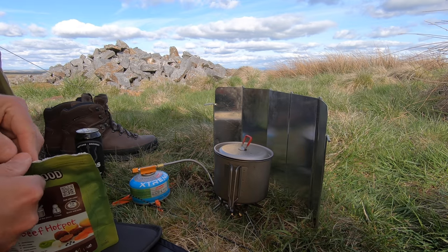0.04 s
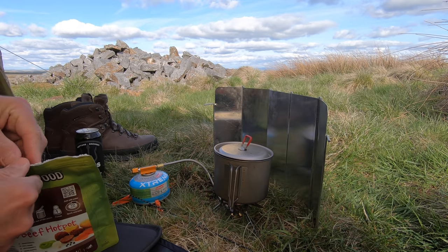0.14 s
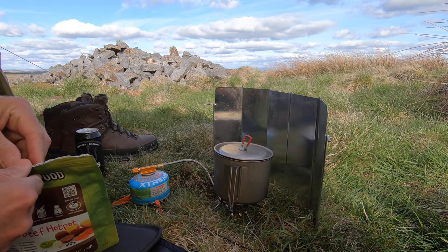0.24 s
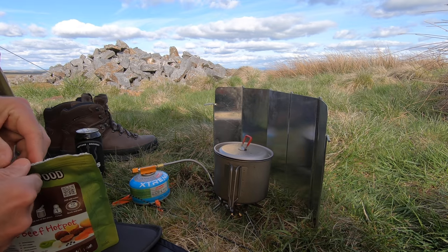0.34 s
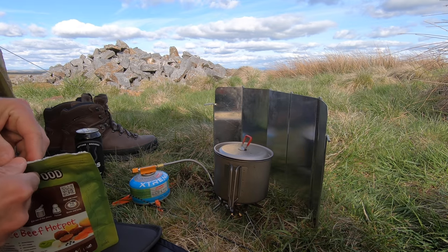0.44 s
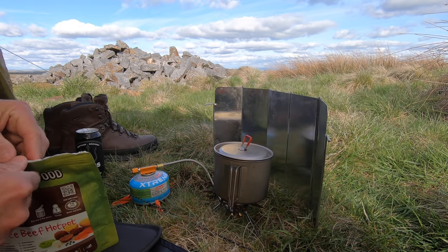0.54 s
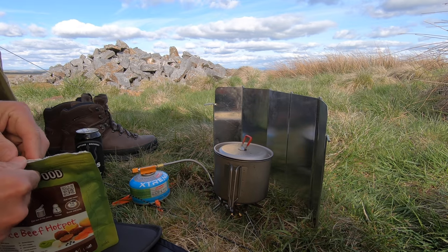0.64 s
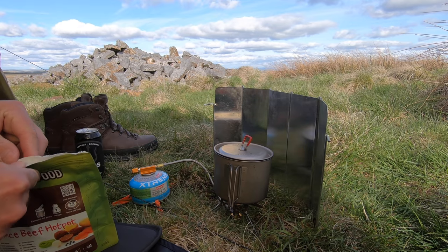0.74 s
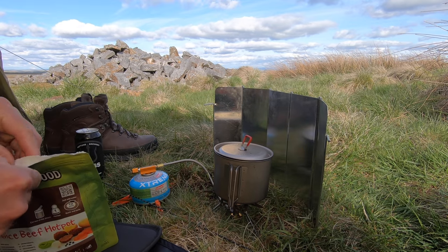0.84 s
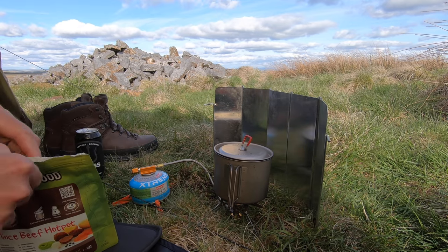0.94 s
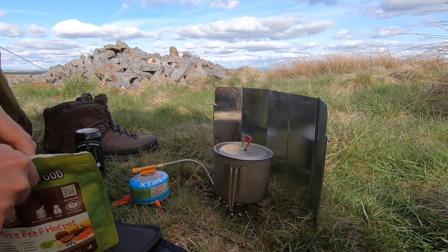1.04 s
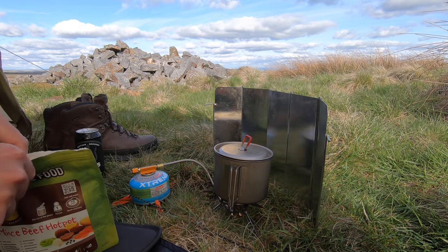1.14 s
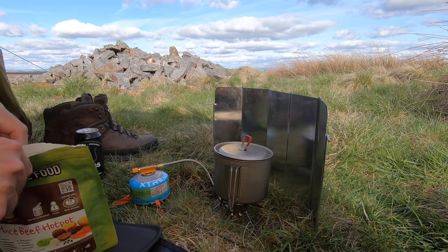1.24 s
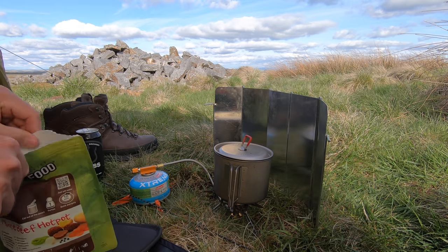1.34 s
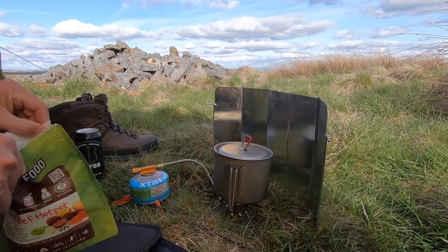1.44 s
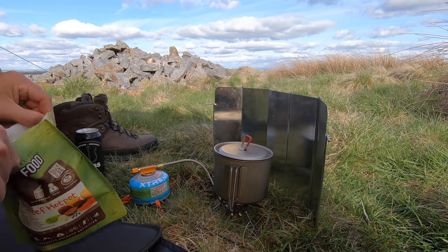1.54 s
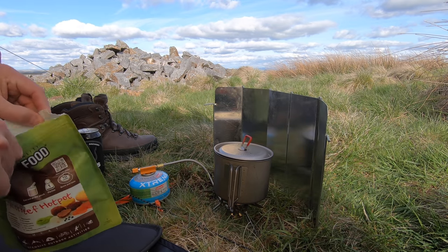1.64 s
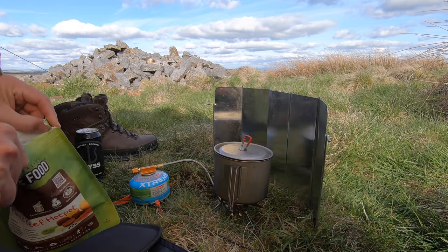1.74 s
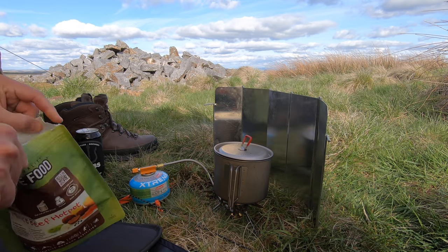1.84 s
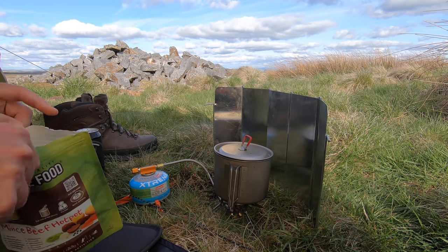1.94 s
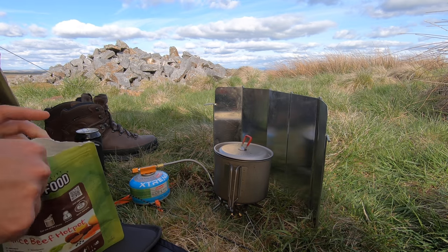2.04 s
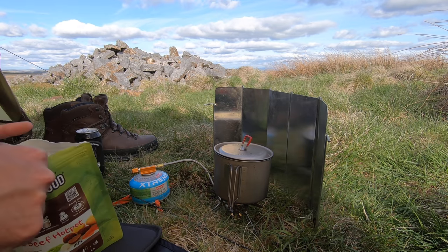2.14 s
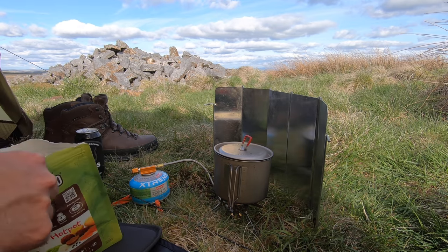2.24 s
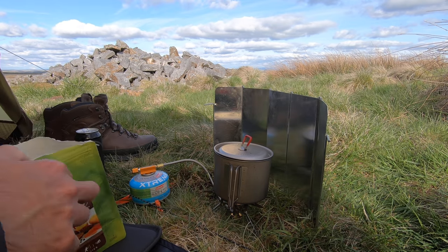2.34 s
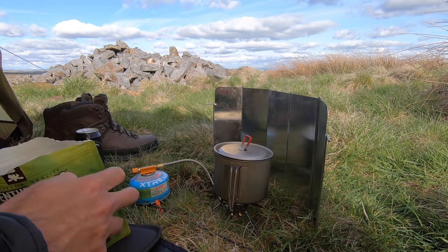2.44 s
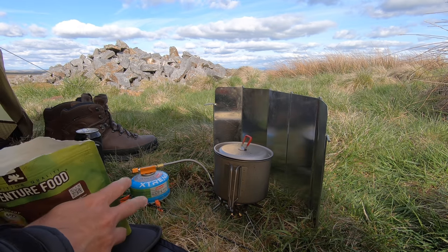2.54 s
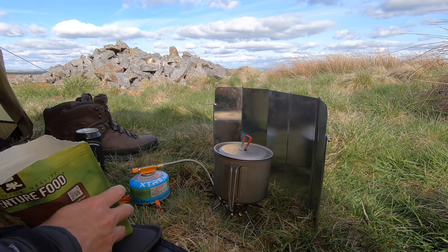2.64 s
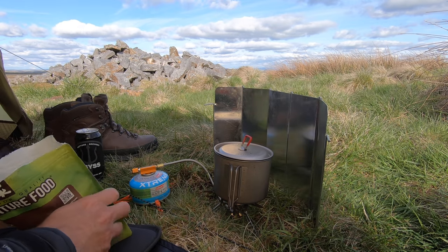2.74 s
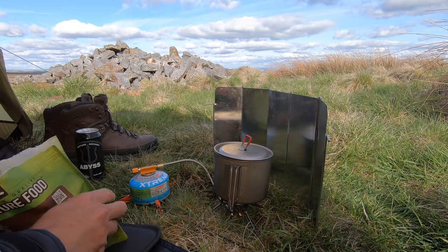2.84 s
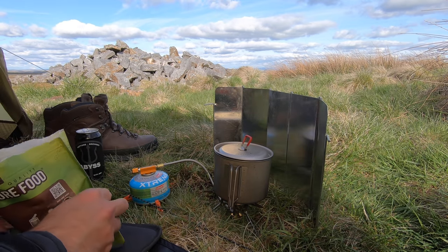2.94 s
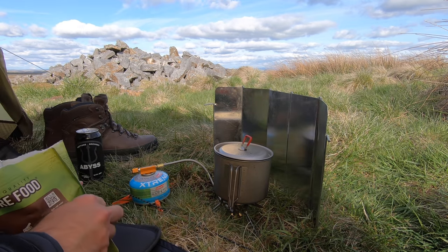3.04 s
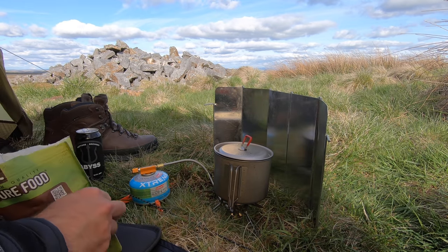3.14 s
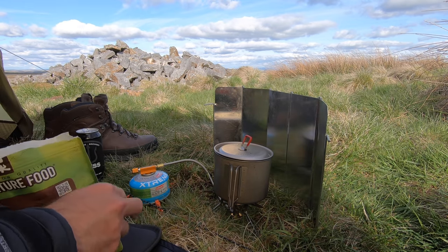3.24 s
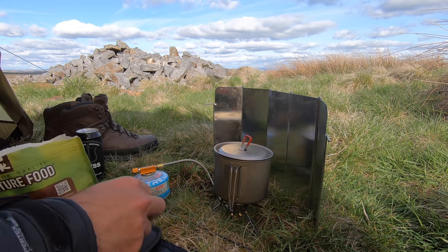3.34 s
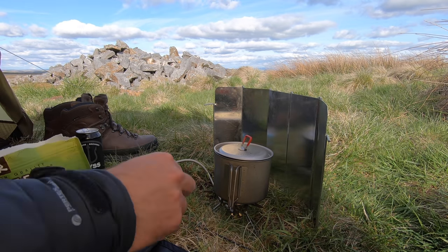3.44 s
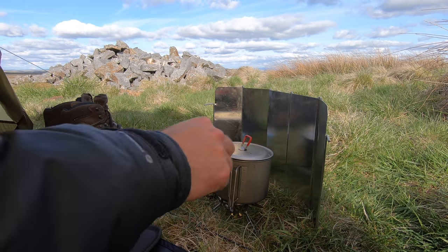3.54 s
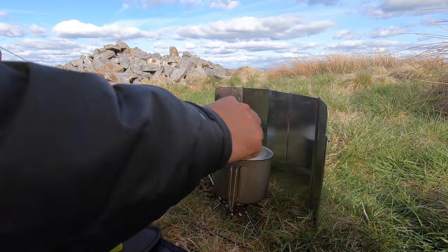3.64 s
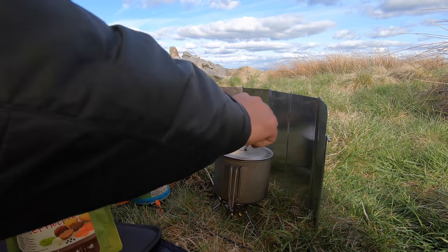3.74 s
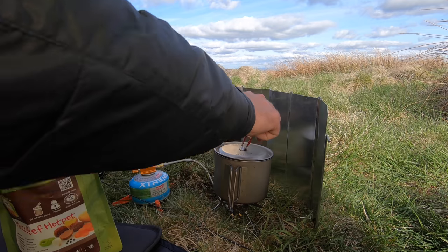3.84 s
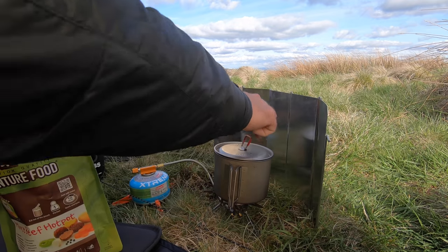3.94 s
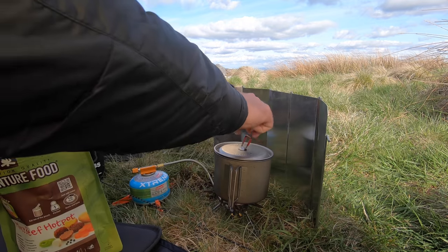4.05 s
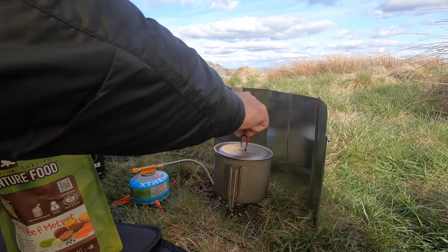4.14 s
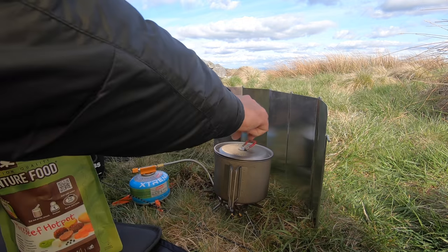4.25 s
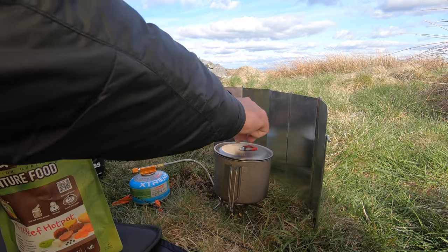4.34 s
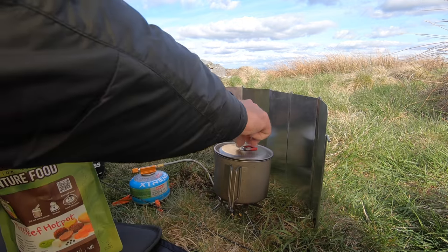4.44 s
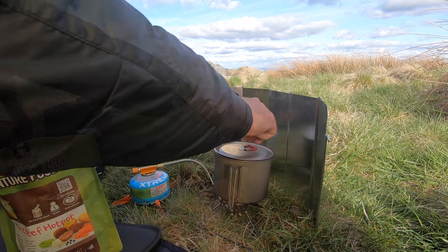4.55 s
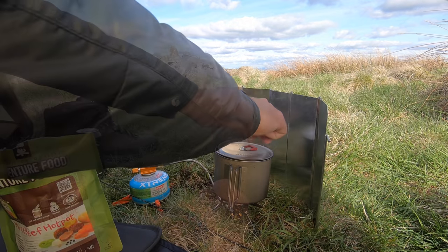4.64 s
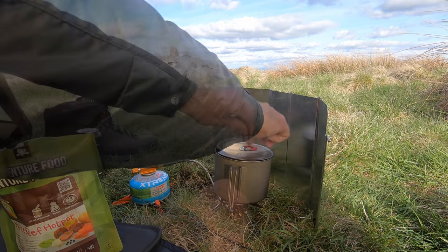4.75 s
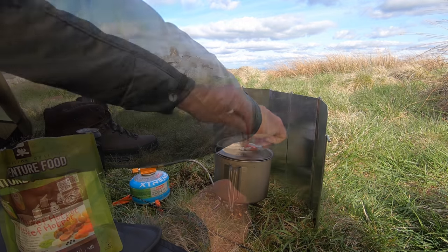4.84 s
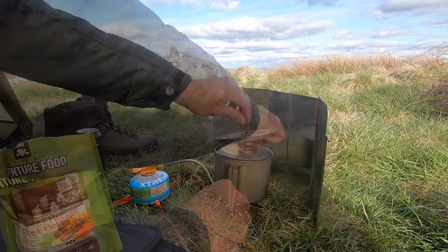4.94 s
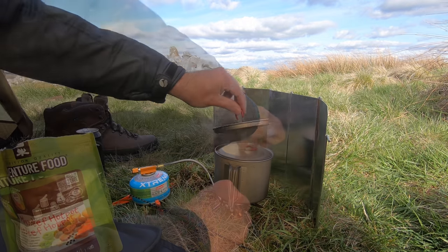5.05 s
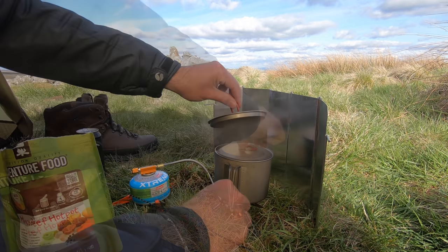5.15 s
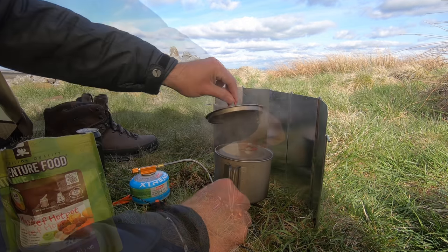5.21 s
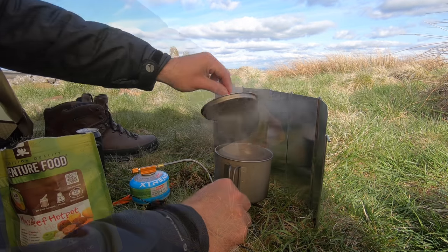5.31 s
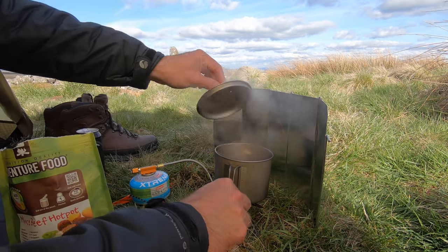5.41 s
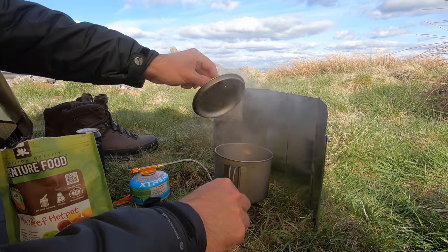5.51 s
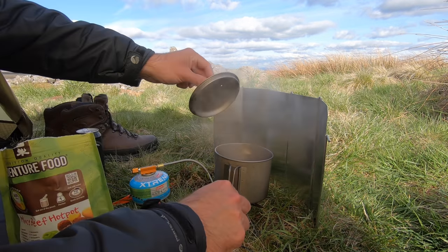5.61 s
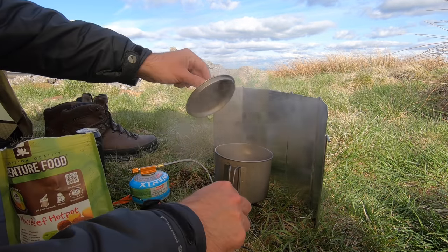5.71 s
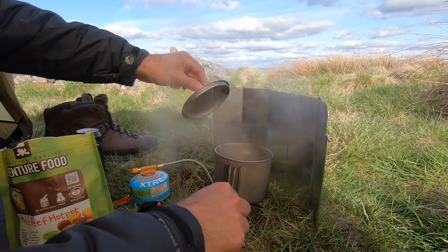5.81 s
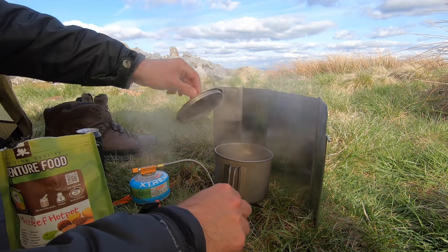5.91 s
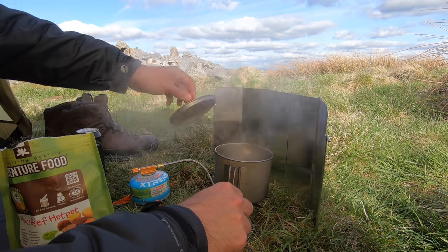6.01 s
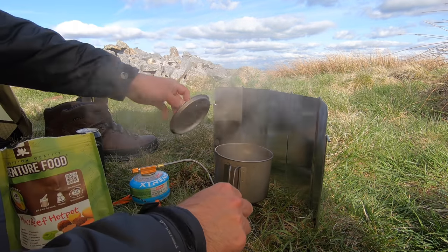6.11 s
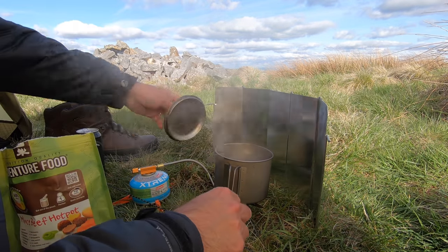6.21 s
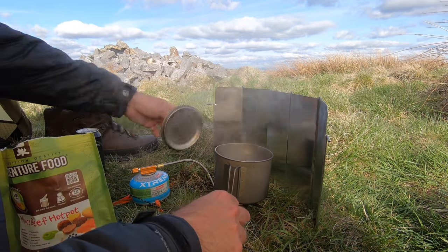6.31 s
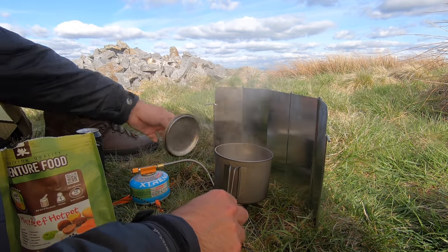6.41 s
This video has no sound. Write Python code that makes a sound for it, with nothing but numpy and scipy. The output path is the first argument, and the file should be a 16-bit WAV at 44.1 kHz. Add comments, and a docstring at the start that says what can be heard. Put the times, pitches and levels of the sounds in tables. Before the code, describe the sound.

A low, steady rumble of stove flame and water underlies everything. First comes irregular foil crinkling, densest around one and a half and again near three seconds, with hard, slightly clipped snaps. Cloth swishes softly, followed by a quick cluster of hollow, ringing lid knocks. Near the end, a thin sheet-metal clink and small bubbling drops sound close up, in dry open air, almost centred.

```python
"""On a grassy hilltop, hands crumple a stiff foil food pouch and a jacket sleeve rubs past.
A thin metal lid is dragged and knocked on its pot, then lifted off the boiling water; it touches a foil wind screen.
A low rumble of flame and water lies under it all. Rubs, hiss and rumble are shaped noise; snaps, knocks and drops
are decaying sines with bursts of noise. The sound is nearly mono, and the hardest snaps clip."""
import sys
import numpy as np
from scipy import signal
from scipy.fft import rfft, irfft, next_fast_len
from scipy.io import wavfile
from scipy.ndimage import uniform_filter1d, map_coordinates

SR = 44100
rng = np.random.default_rng(int(sys.argv[2]) if len(sys.argv) > 2 else 0)


def store_wav(level_fs):
    """Save 16-bit WAV to argv[1]."""
    pcm = np.round(np.clip(np.atleast_2d(level_fs), -1, 1) * 32767)
    wavfile.write(sys.argv[1], SR, pcm.T.astype(np.int16))


N = 285518
TIME = np.arange(N) / SR  # s

# colour of bright foil noise: pitch_hz [Hz], gain_db [dB]
FOIL_COLOUR = [(1180, -38.5), (2000, -7.5), (3220, -11), (3580, -5.5), (5770, -3.5), (6470, -5.5),
               (10500, -12.5), (11600, -18), (15400, -25), (16500, -76)]


def amp(db):
    """Gain of a level in dB."""
    return 10 ** (np.asarray(db) / 20)


def unit(x):
    """x at rms 1."""
    return x / np.sqrt(np.mean(x ** 2) + 1e-20)


def along(points, hz):
    """Values at hz, read from (Hz, value) points on a log frequency axis."""
    point_hz, value = np.transpose(points)
    return np.interp(np.log(hz + 1), np.log(point_hz + 1), value)


def curves(rows):
    """One value per sample for each column after the time."""
    s, *columns = np.transpose(rows)
    return [np.interp(TIME, s, column) for column in columns]


def between(rows):
    """Gain of a (s, dB) curve, silent outside it."""
    return amp(curves(rows)[0]) * (TIME > rows[0][0]) * (TIME < rows[-1][0])


def wobble(rate):
    """A smooth random curve, rate knots a second."""
    knots = rng.standard_normal(int(N * rate / SR) + 4)
    return map_coordinates(knots, [np.arange(N) * rate / SR])


def filtered(x, response):
    """x passed through a complex response of frequency."""
    m = next_fast_len(N + SR // 2)
    return irfft(rfft(x, m) * response(np.fft.rfftfreq(m, 1 / SR)), m)[..., :N]


def resonances(peaks):
    """Causal response of (Hz, width Hz, dB) resonances, alternating in sign."""
    def response(f):
        total = 0
        for k, (centre, width, db) in enumerate(peaks):
            damping = 1j * f * width
            total = total + (-1) ** k * amp(db) * damping / (centre * centre - f * f + damping)
        return total
    return response


def causal(spectrum):
    """Minimum-phase response with the gain of (Hz, dB) points."""
    def response(hz):
        cepstrum = irfft(np.log(amp(along(spectrum, hz)) + 1e-6))
        half = len(cepstrum) // 2
        cepstrum[1:half] *= 2
        cepstrum[half + 1:] = 0
        return np.exp(rfft(cepstrum))
    return response


def rush(spectrum, patchy_db, grain_db, rate):
    """Coloured noise of rms 1, patchy in time and frequency, grainy at rate lumps a second."""
    grainy = rng.standard_normal(N) * amp(grain_db * wobble(rate))
    z = signal.stft(grainy, nperseg=512)[2]
    patches = uniform_filter1d(rng.standard_normal(z.shape), size=6, axis=0)
    patches = uniform_filter1d(patches, size=8, axis=1)
    noise = signal.istft(z * amp(patchy_db * unit(patches)), nperseg=512)[1][:N]
    return unit(filtered(noise, lambda hz: amp(along(spectrum, hz))))


def scattered(x):
    """x with all its phases drawn anew."""
    z = signal.stft(x, nperseg=128)[2]
    return signal.istft(z * np.exp(2j * np.pi * rng.random(z.shape)), nperseg=128)[1][:N]


def add(track, s, sound):
    """Lay a sound on a track at time s."""
    spot = track[round(s * SR):][:len(sound)]
    spot += sound[:len(spot)]


def fading(t, t60, attack):
    """A quick rise and an exponential fall of 60 dB in t60."""
    return amp(-60 * t / np.abs(t60)) * (1 - np.exp(-t / attack))


def ringing(hz, db, t60, t, scatter_db):
    """Decaying modes at random phases, each at random 2 to 4 times scatter_db below its db."""
    luck = rng.random((len(hz), 2))
    level = amp(db[:, None] + scatter_db * (2 * luck[:, :1] - 4.0))
    tone = np.sin(2 * np.pi * (hz[:, None] * t + luck[:, 1:]))
    return np.sum(level * fading(t, t60[:, None], .0003) * tone, axis=0)


def strokes(rows, shape):
    """Hiss and body gain of overlapping strokes, summed in power."""
    power = 0
    for start, end, hiss_db, body_db in rows:
        power = power + (amp([[hiss_db], [body_db]]) * shape(TIME, start, end)) ** 2
    return np.sqrt(power)


def rumble():
    """Low turbulent noise of the flame, and a narrower gurgle of boiling water once the pot is open."""
    # flame, boiling water and handling: start_s [s], level_db [dB]
    flame_level = [(0, -48), (.61, -44), (.9, -47.5), (1.41, -46.5), (1.53, -47), (2.34, -45), (2.76, -37),
                   (2.88, -42.5), (3.41, -50), (3.77, -41.5), (4.27, -45.5), (4.42, -57.5), (4.7, -55),
                   (5.24, -48.5), (5.97, -48.5), (6.47, -44)]
    # colour of the rumble: pitch_hz [Hz], level_db [dB per Hz]
    flame_colour = [(13, -57.5), (22, -24), (27, -20), (70, -6.5), (140, -1.5), (180, -1), (240, -3.5),
                    (311, -2), (422, -11.5), (700, -43), (910, -60), (1540, -120)]
    # gurgle of the open pot, before its fade-in: start_s [s], level_db [dB]
    gurgle_level = [(4.45, -72), (4.65, -66), (5.0, -57), (5.1, -51), (5.65, -44), (5.83, -51.5),
                    (6.01, -43), (6.47, -47)]
    flame = rush(flame_colour, patchy_db=.5, grain_db=1, rate=25)
    bubbling = resonances([(90, 60, -3), (185, 90, .1)])
    gurgle = unit(filtered(rng.standard_normal(N), lambda hz: bubbling(hz) ** 2))
    opened = np.clip((TIME - gurgle_level[0][0]) / 0.38, 0, 1)  # fades in over 0.38 s
    return amp(curves(flame_level)[0]) * flame + amp(curves(gurgle_level)[0]) * opened * gurgle


def drops():
    """Bubbles and drops tick in the pot: a brief rising tone and a small spit of treble; fainter ones are random."""
    # clear ticks: start_s [s], level_db [dB, before trims], pitch_hz [Hz, at onset]
    clear = [(4.8025, -40.5, 2610), (4.8683, -42, 1240), (5.236, -31.5, 1720), (5.3083, -36, 1720),
             (5.3283, -32.5, 2770), (5.3727, -34, 2650), (5.4106, -25.5, 1720), (5.4974, -31.5, 1720),
             (5.6251, -37, 2650), (5.8845, -36, 3620), (5.9464, -34, 1790), (6.0651, -39, 1630),
             (6.1085, -37, 3580), (6.1694, -31.5, 1140), (6.2447, -26, 1690), (6.2667, -26, 1750),
             (6.2851, -25, 1770), (6.3525, -33, 4300), (6.3864, -29.5, 1760), (6.4283, -28, 4500)]
    splash_db = -11.5
    luck = rng.random((70, 3))
    faint_s = 5.3 + 1.65 * luck[:, 0] ** .55  # thicker towards the end
    faint_db = -45 - 5 * np.log(luck[:, 1] + 0.14)
    faint_hz = 1100 * 4.5 ** luck[:, 2]
    tones, spit, t = np.zeros(N), np.zeros(N), np.arange(SR // 20) / SR
    for s, db, hz in [*clear, *zip(faint_s, faint_db, faint_hz)]:
        rising = hz * t * (1 + 6 * t)  # a bubble's pitch climbs as it nears the surface
        add(tones, s, amp(db - 3.5) * fading(t, 0.017, 0.00025) * np.sin(2 * np.pi * rising))
        add(spit, s, amp(db + splash_db) * fading(t, 0.022, 0.00058) * rng.standard_normal(len(t)))
    return tones + filtered(spit, lambda hz: resonances([(4000, 8000, 2.5)])(hz) ** 2)


def screen():
    """The lid touches the wind screen, a thin sheet: many modes ring under a wash of treble."""
    # contacts: start_s [s], wash_db [dB], ring_db [dB, before mode levels]
    touches = [(5.691, -36, -50), (5.6975, -19, -25), (5.702, -21, -42), (5.707, -19, -38),
               (5.717, -24, -44), (6.045, -46, -50)]
    # modes of the sheet: pitch_hz [Hz], level_db [dB, before scatter], t60_s [s]
    sheet_modes = [(1420, -24, .4), (2127, -20, .8), (2231, -21, .8), (2290, -23, .6), (2504, -15, .4),
                   (2713, -9, .28), (3523, -12, .5), (3650, -13, .3), (3828, -14, .28), (3987, -11, .24),
                   (4137, -14, .3), (4450, -13, .25), (4760, -9, .25), (4920, -12, .28), (5067, -8, .35),
                   (5350, -10, .25), (5750, -1, .08), (6210, -2, .13), (6784, -10, .33), (7273, -8, .2),
                   (7600, -8, .18), (7741, -10, .25), (8250, -9, .16), (8700, -9, .2), (9238, -5, .11),
                   (9932, -8, .13)]
    ring, wash, t = np.zeros(N), np.zeros(N), np.arange(SR // 2) / SR
    for s, wash_db, ring_db in touches:
        add(ring, s, amp(ring_db) * ringing(*np.transpose(sheet_modes), t, scatter_db=1.5))
        add(wash, s, amp(wash_db) * fading(t, 0.12, 0.00037) * rng.standard_normal(len(t)))
    return ring + filtered(wash, lambda hz: resonances([(5800, 7000, .1)])(hz) ** 2)


def sleeve_sweep():
    """Hiss and body gain of the jacket sleeve sweeping past, swelling and fading."""
    # sweeps: start_s [s], end_s [s], hiss_db [dB], body_db [dB]
    sweeps = [(3.25, 3.57, -39, -46.5), (3.5, 4.2, -41, -39.5)]

    def swell(t, start, end):
        return np.abs(np.sin(np.pi * np.clip((t - start) / (end - start), 0, 1))) ** 0.74
    return strokes(sweeps, swell)


def crumpling():
    """Hiss and body gain of hands working the pouch: each stroke grips, holds and lets go exponentially."""
    # strokes: start_s [s], end_s [s], hiss_db [dB], body_db [dB]
    handling = [(-.05, .74, -45.5, -43.5), (.75, .815, -47.5, -45.5), (.37, .44, -40, -45.5),
                (.69, .74, -38, -58), (.88, 1.11, -48, -50.5), (1.14, 1.23, -47.5, -48),
                (1.23, 1.28, -41, -40), (1.28, 1.31, -42.5, -40), (1.31, 1.435, -38, -33.5),
                (1.468, 1.485, -38, -47), (1.5, 1.54, -42.5, -41.5), (1.54, 1.99, -47, -42.5),
                (1.785, 1.81, -37.5, -29.5), (1.99, 2.29, -46, -46), (2.02, 2.21, -40, -38),
                (2.28, 2.37, -38, -38.5), (2.39, 2.56, -33, -34.5), (2.58, 2.79, -35, -33),
                (2.625, 2.665, -28, -32), (2.8, 2.86, -49, -45), (2.865, 2.975, -39, -40),
                (2.9, 2.92, -33, -32), (3.04, 3.09, -42.5, -39.5), (3.02, 3.24, -47, -42.5)]
    grip_s, let_go_s = 0.0091, 0.012  # time constants of rise and fall

    def hold(t, start, end):
        return np.exp(np.minimum(0, (t - start) / grip_s) + np.minimum(0, (end - t) / let_go_s))
    return strokes(handling, hold)


def rubbing():
    """Foil and cloth slide in countless tiny slips; a faint background hiss shares their colours."""
    # colours of hiss, treble sheen and body: pitch_hz [Hz], level_db [dB per Hz]
    hiss_colour = [(1350, -27.5), (2300, -0.5), (2910, -8.5), (3930, 2), (4490, 1), (4890, 1), (6800, -2),
                   (9000, -6), (11700, -15), (19800, -120)]
    sheen_colour = [(4410, -10.5), (7500, -7), (8410, -6.5), (9160, -9), (9910, -8), (14300, -13),
                    (15200, -17), (16000, -31)]
    body_colour = [(260, -3.5), (450, 1), (961, -2), (1090, -1), (1300, -4.5), (1670, -1), (1890, -4),
                   (3300, -10), (4290, -23), (7260, -120)]
    # faint background hiss under it all, sinking after the lid knocks and rising again towards the end:
    # start_s [s], hiss_db [dB], body_db [dB]
    background_level = [(0, -50, -61), (4.3, -59, -52.5), (4.65, -62.5, -61), (4.95, -58.5, -58),
                        (5.24, -55.5, -58), (5.4, -51, -52), (5.69, -51.5, -49), (5.91, -56.5, -58),
                        (6.08, -56.5, -56), (6.28, -48.5, -48), (6.35, -50, -50.5), (6.47, -44, -48)]
    foil_sheen_db, cloth_sheen_db, background_sheen_db = -8.5, -6.5, -4.5  # relative to each one's hiss
    foil, sleeve, background = crumpling(), sleeve_sweep(), amp(curves(background_level))
    hiss, body = np.sqrt(foil ** 2 + sleeve ** 2 + background ** 2)
    sheen = np.linalg.norm([amp(foil_sheen_db) * foil[0],
                            amp(cloth_sheen_db) * sleeve[0],
                            amp(background_sheen_db) * background[0]], axis=0)
    flutter = amp(0.99 * wobble(40) + 0.72 * wobble(12))
    layers = hiss * rush(hiss_colour, patchy_db=2.0, grain_db=2.0, rate=530)
    layers += sheen * rush(sheen_colour, patchy_db=0.0, grain_db=1.5, rate=890)
    layers += body * rush(body_colour, patchy_db=0.13, grain_db=3.0, rate=220)
    return flutter * layers


def squeak():
    """Fingers slide along the foil: breathy noise in one narrow resonance swells and fades with each slide."""
    # slides: start_s [s], end_s [s], pitch_hz [Hz], width_hz [Hz], level_db [dB]
    slides = [(0.32, 0.437, 5860, 1300, -44), (.58, .62, 8000, 1500, -47), (.7, .745, 8500, 2500, -43),
              (.89, 0.996, 5400, 1500, -47), (1.05, 1.234, 1690, 200, -50.5),
              (1.272, 1.313, 5770, 1200, -43), (2.294, 2.342, 5200, 1400, -37.5),
              (2.394, 2.46, 4400, 1500, -33), (3.312, 3.468, 4000, 900, -46)]
    out = np.zeros(N)
    for start, end, centre_hz, width_hz, db in slides:
        resonance = resonances([(centre_hz, width_hz, 0)])
        band = unit(filtered(rng.standard_normal(N), lambda hz: resonance(hz) ** 2))
        swell = np.sin(np.pi * np.clip((TIME - start) / (end - start), 0, 1)) ** .5
        out += amp(db) * swell * (TIME < end) * band
    return out


def lid():
    """Knocks ring the lid and the pot's hollow; dragging feeds the seated lid with rough noise."""
    # lid against the pot: start_s [s], level_db [dB, before trims], hollow_db [dB, relative, before trim],
    # tilt_db [dB per octave], spot [0 rim - 1 seated]
    knocks = [(4.157, -32, -5, -12, 1), (4.163, -25.5, 0.5, -5, 1), (4.201, -19.5, -9, -10, 1),
              (4.231, -16, -8, -7, 1), (4.258, -9, -15, 4, .68), (4.279, -25, -9, -2, .67),
              (4.316, -23, -21, 13, .85), (4.332, -5, -12, 2.5, 0.58), (4.345, 1.5, -7.5, 2.3, 0.042),
              (4.361, -25, -3, 4, .33), (4.411, -4.5, -17, 0.3, 0.13), (4.43, -9, -13, -1.5, .2),
              (4.739, -44, -20, -4, .3), (4.774, -40.5, -23, -3, .3), (4.982, -22, -23, 7, 0.69),
              (5.007, -23, -6.5, 2.5, 1)]
    # lid sliding on the rim: start_s [s], level_db [dB, before trims]
    drag = [(4.195, -35), (4.203, -27.5), (4.25, -27.5), (4.262, -18), (4.325, -26.5), (4.35, -21.5),
            (4.405, -25), (4.415, -16.5), (4.44, -33.5), (4.47, -46)]
    # modes of the free lid: pitch_hz [Hz], t60_s [s]
    lid_modes = [(1220, .6), (1490, .3), (1600, .3), (1880, .25), (1911, .3), (2485, .19), (2630, .12),
                 (2703, .24), (3258, .8), (3287, .75), (4205, .6), (4350, .1), (4651, .15), (4980, .07),
                 (5185, .22), (5320, .36), (5660, .07), (6350, .08), (6489, .58), (7150, .08), (7640, .2),
                 (7740, .3), (7860, .15), (8272, .1), (8760, .1), (9150, .22), (11510, .2)]
    # strength of each of those modes: rim_db [dB, struck at the rim], seated_db [dB, struck while seated]
    mode_strength = [(-25, -35), (-33, -9), (-49, -1.5), (-3.5, -3), (-7, -26), (0, -6), (5.5, 3),
                     (-1, -21), (-15.5, -32), (-14, -26), (-20, -11), (0, 6.5), (-25, -8), (-23, -4),
                     (-2.5, -8), (-19, -1), (-19, -24), (-10, -7), (-3, -36), (-10, -14), (-10, -5.5),
                     (-29, -6), (-8, -17), (-17, -13), (-11, -15), (-14, -17), (-19, -32)]
    # air of the shut pot, air of the open pot, then its wall: pitch_hz [Hz], width_hz [Hz], level_db [dB]
    pot_notes = [(399, 62, 3), (560, 66, 1.5), (1030, 170, -5), (1700, 62, -8)]
    seated_damping = 4.8  # added to 1/t60 of a fully seated lid, 1/s
    ajar_s, opening_s = 4.36, 0.08  # the lid tips open and the pot's air note jumps up
    (hz, t60), (rim_db, seated_db) = np.transpose(lid_modes), np.transpose(mode_strength)

    metal, crack, blows, t = np.zeros(N), np.zeros(N), np.zeros(N), np.arange(SR // 2) / SR
    for s, db, hollow_db, tilt_db, spot in knocks:
        noise = rng.standard_normal((2, len(t)))
        strength = (1 - spot) * rim_db + spot * seated_db
        strength = strength + tilt_db * np.log2(hz / 4000)  # a negative tilt makes a duller blow
        damped_t60 = 1 / (1 / t60 + seated_damping * abs(spot))
        add(metal, s, amp(db - 10.0) * ringing(hz, strength, damped_t60, t, scatter_db=3))
        add(crack, s, amp(db - 3.5 + 0.97 * tilt_db) * fading(t, 0.043, 0.00061) * noise[0])
        add(blows, s, amp(db + hollow_db + 25.0) * fading(t, 0.011, 0.00047) * noise[1])

    grit = rng.standard_normal(N) * amp(2.5 * wobble(300) + 3 * wobble(60))
    sliding = between(drag)
    seated_modes = list(zip(hz, np.full(len(hz), 80.), seated_db))  # each 80 Hz wide
    scrape = amp(-5) * sliding * unit(filtered(grit, resonances(seated_modes)))

    push = blows + amp(7) * sliding * grit
    ajar = 0.24 + 0.58 * np.clip((TIME - ajar_s) / opening_s, 0, 1)
    shut_note, open_note, *wall = pot_notes
    shut_pot = filtered((1 - ajar) * push, resonances([shut_note, *wall]))
    open_pot = filtered(ajar * push, resonances([open_note, *wall]))
    hollow = amp(2.5) * (shut_pot - open_pot)
    return metal + scrape + hollow + filtered(crack + amp(-2) * sliding * grit, causal(FOIL_COLOUR))


def faint_snaps(count):
    """Small creases come thicker and louder where the crumpling is harder."""
    over_hiss_db, wall_db = 13, -6  # loudest one over the crumple hiss; wall knock, both before pouch trims
    luck, effort = rng.random((count, 3)), crumpling()[0]
    share = np.cumsum(effort ** 0.66)
    spot = np.searchsorted(share, luck[:, 0] * share[-1])
    db = 20 * np.log10(effort[spot]) + over_hiss_db - 4 * luck[:, 1]
    return zip(spot / SR, db, 2600 * 2.6 ** luck[:, 2], np.full(count, wall_db))


def pouch():
    """A crease buckles: a few cycles at its own pitch, a fizzing tail and a knock in the wall; air is pushed out."""
    # loudest creases: start_s [s], level_db [dB, before trims], pitch_hz [Hz], wall_db [dB, relative, before trims]
    snaps = [(.255, -8.5, 4500, -8), (.1151, -28, 3700, -17), (.3412, -24, 5850, -6),
             (.7083, -14.5, 3800, -27), (.7174, -24, 4810, -25), (.7317, -12.5, 8700, -22),
             (.7792, -8.5, 5040, -11), (.8088, -4.5, 5460, -24), (.856, -17.5, 5000, -24),
             (.9955, 0.5, 5600, -16.5), (1.0328, -10.5, 5640, -20), (1.223, -25, 5640, 4),
             (1.2436, 6.5, 5860, -20.5), (1.2534, -14, 4340, -9), (1.265, -1, 4570, -24),
             (1.3117, -9, 4850, -12), (1.328, 0, 4800, -19), (1.3454, -7.5, 4300, -8.5),
             (1.3556, -2, 4280, -12), (1.3792, -4.5, 4700, -40), (1.3844, -4, 4920, -18),
             (1.3976, -2, 2570, -8.5), (1.4154, -25, 2620, -14), (1.4245, -18, 3300, -22),
             (1.436, -23, 5030, -9.5), (1.464, -12, 8400, -14), (1.4704, -14.5, 2560, -7),
             (1.479, -7.5, 3320, -4.5), (1.5016, -28, 3780, -7), (1.5151, -10, 4870, -19),
             (1.5294, -15.5, 4450, -8.5), (1.6772, -12.5, 3070, -4), (1.726, -23.5, 2730, -4),
             (1.7761, -21.5, 2680, -3), (1.7909, -3.5, 4560, -10), (1.8067, -15.5, 2570, -6),
             (1.8366, -23, 2760, -2), (1.92, -25.5, 3330, -1.5), (2.0188, -24.5, 3780, -4),
             (2.049, -16.5, 5000, -20), (2.0847, -16.5, 3660, -7.5), (2.092, -12.5, 5270, -1.5),
             (2.3955, -29, 4000, -6), (2.4585, -13, 4500, -12), (2.5874, -13, 3600, -3.5),
             (2.6244, -25, 5640, 6.5), (2.6453, -13.5, 4670, -3.5), (2.6774, -15.5, 5740, 6),
             (2.6942, -19, 5320, -1.5), (2.7222, -20, 3560, -4), (2.7462, -15.5, 5200, 3.5),
             (2.7533, -13.5, 4040, 1), (2.7653, -14, 2540, 2.5), (2.7784, -24, 4660, 15.5),
             (2.7856, 3.5, 5230, -21.5), (2.818, -12, 3960, -3.5), (2.861, -14.5, 4100, -2.5),
             (2.8722, -17, 4040, -26), (2.8968, -12, 4140, -10), (2.9117, -5, 4040, -11),
             (2.9342, -12, 3950, -14.5), (3.0717, 3.5, 4110, -17), (3.1298, -27.5, 4900, 2),
             (3.1428, -22, 3620, -8), (3.1917, -24.5, 5240, 0), (3.2087, -30.5, 5450, 8),
             (3.223, -18.5, 4700, -7), (3.2994, -31.5, 3800, 6.5)]
    # pouch walls: pitch_hz [Hz], width_hz [Hz], level_db [dB]
    panels = [(883, 590, 2.5), (2090, 1800, -6.5)]
    # air pushed out: start_s [s], level_db [dB, before trims], pitch_hz [Hz, at onset],
    # deep_db [dB, relative, before trim]
    thumps = [(.249, -24, 304, -21), (.344, -25.5, 280, -18), (.784, -18.5, 322, -24),
              (1.061, -26, 288, -31), (1.242, -20, 330, -29), (1.27, -22.5, 190, -12),
              (1.317, -26, 227, -14), (1.344, -17, 319, -8.5), (1.357, -18.5, 201, -26),
              (1.399, -27, 507, -4), (1.461, -26, 406, -26), (1.533, -25, 337, -20), (1.792, -13, 313, -27),
              (1.804, -21.5, 234, -2), (1.839, -18, 249, -28), (1.996, -22, 445, -26),
              (2.01, -28, 282, -18), (2.041, -23.5, 293, -25), (2.054, -25, 290, -15),
              (2.303, -31, 294, -6), (2.383, -27.5, 234, -3), (2.398, -25.5, 335, -1),
              (2.465, -17.5, 258, -9.5), (2.59, -29, 328, -17), (2.665, -18.5, 567, -26),
              (2.685, -28, 174, -6), (2.707, -17.5, 358, -23), (2.732, -23.5, 242, -24),
              (2.789, -22, 242, -29), (2.86, -19, 187, -25), (3.071, -14.5, 360, -30),
              (3.192, -27, 348, -29)]
    fizz_t60, wall_centre_hz, wall_spread = 0.022, 1010, 0.11  # s, Hz; wall pitch scatters log-normally
    thump_cycles = 11.4  # onset-pitch cycles to fall 60 dB
    tones, fizz, rattle = np.zeros((3, N))
    t = np.arange(SR // 16) / SR
    for s, db, hz, wall_db in [*snaps, *faint_snaps(count=45)]:
        noise = rng.standard_normal((2, len(t)))
        wall_hz = wall_centre_hz * np.exp(wall_spread * rng.standard_normal())
        crease = fading(t, 0.26 * fizz_t60, 0.00036) * np.sin(2 * np.pi * hz * t)
        wall = fading(t, 0.55 * fizz_t60, 0.00025) * np.sin(2 * np.pi * wall_hz * t)
        tail = amp(db) * fading(t, fizz_t60, 0.00054)
        click = amp(db - 0.2 * wall_db) * fading(t, 0.0034, .0001)
        add(tones, s, amp(db + 1.0) * crease)
        add(tones, s, amp(db + wall_db + 3) * wall)
        add(fizz, s, (tail + click) * noise[0])
        add(rattle, s, amp(db + wall_db + 9.5) * fading(t, 1.05 * fizz_t60, 0.00062) * noise[1])
    t = np.arange(SR // 8) / SR
    for s, db, hz, deep_db in thumps:
        sag = hz * t * (1 - 3.7 * t)  # the pocket slackens and its pitch sinks
        add(tones, s, amp(db + 6.5) * fading(t, thump_cycles / hz, 0.0013) * np.sin(2 * np.pi * sag))
        add(tones, s, amp(db + deep_db + 11.5) * fading(t, 0.083, 0.012) * np.sin(2 * np.pi * 105 * t))
    return tones + filtered(fizz, causal(FOIL_COLOUR)) + filtered(rattle, resonances(panels))


def scene():
    """All sources in the middle; a faint phase-scattered trace of them differs between left and right."""
    # side of the steady sound below its middle: pitch_hz [Hz], level_db [dB]
    side_level = [(60, -33), (500, -31.5), (1200, -45), (14000, -69)]
    steady = rumble() + drops() + rubbing() + squeak()
    hits = screen() + lid() + pouch()
    side = filtered(scattered(steady), lambda hz: amp(along(side_level, hz)))
    side += amp(-38.5) * filtered(scattered(hits), lambda hz: hz > 2000)
    return steady + hits + np.array([side, -side])


def record(dry):
    """The deepest bass is cut, hard snaps clip, then everything above the band limit is removed."""
    ceiling, top_hz = .9, 16645  # full scale, Hz
    lean = filtered(dry, lambda hz: (1j * hz / (25 + 1j * hz)) ** 2)
    clipped = lean / (1 + np.abs(lean / ceiling) ** 8) ** (1 / 8)
    return filtered(clipped, lambda hz: hz < top_hz)


dry = scene()
out = record(dry)
store_wav(out)
```